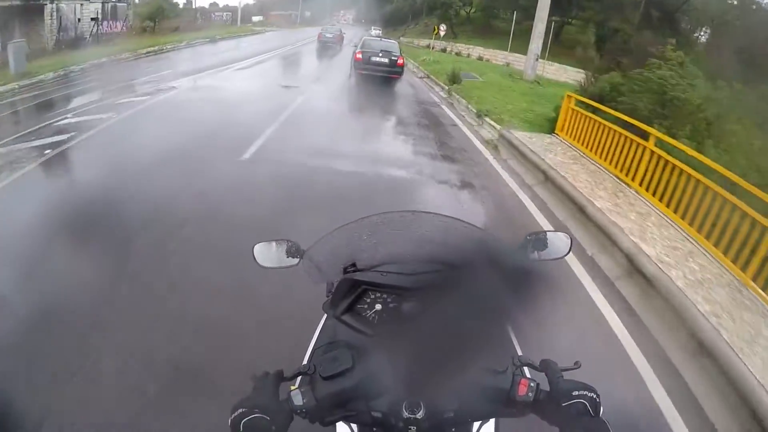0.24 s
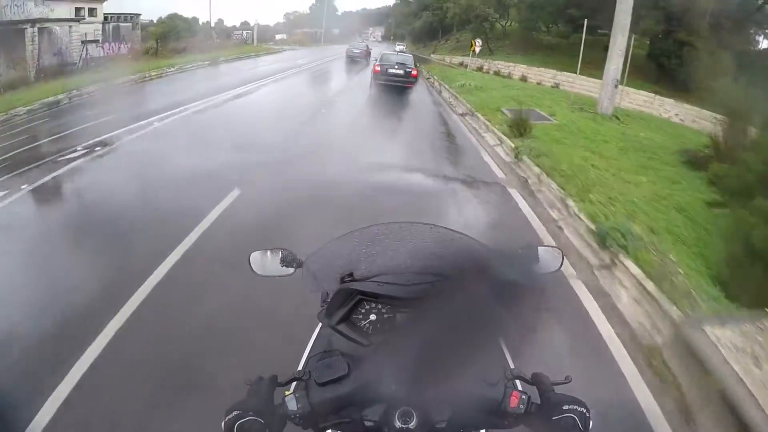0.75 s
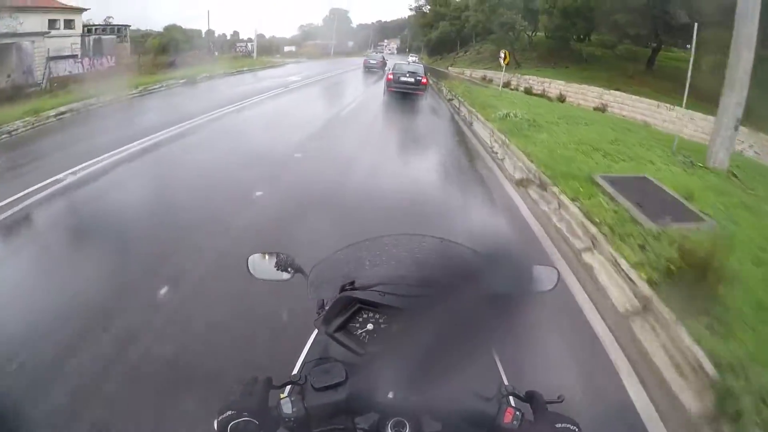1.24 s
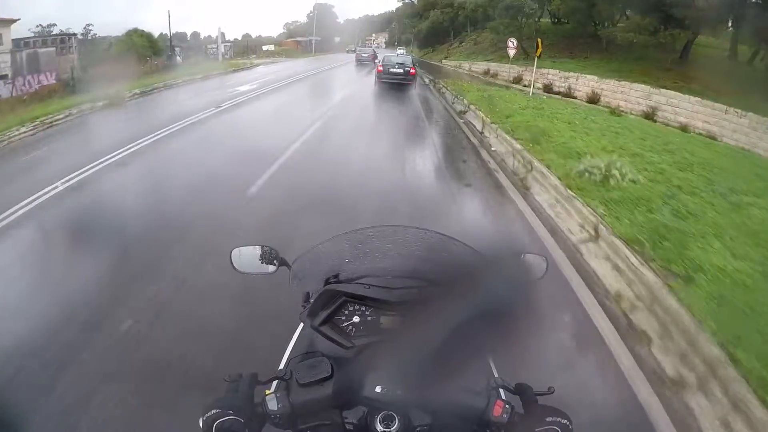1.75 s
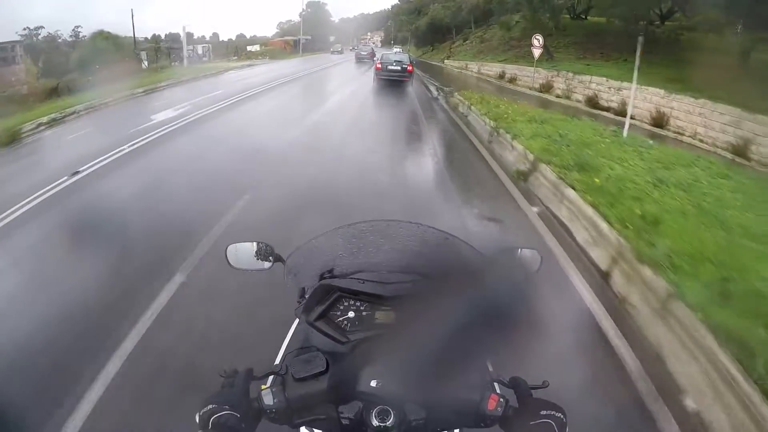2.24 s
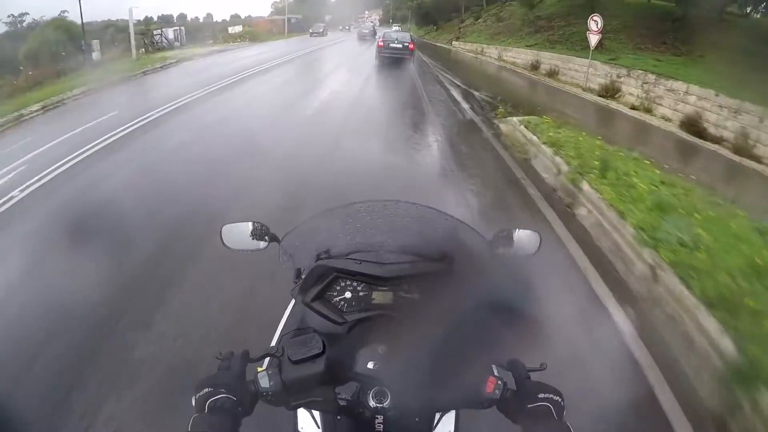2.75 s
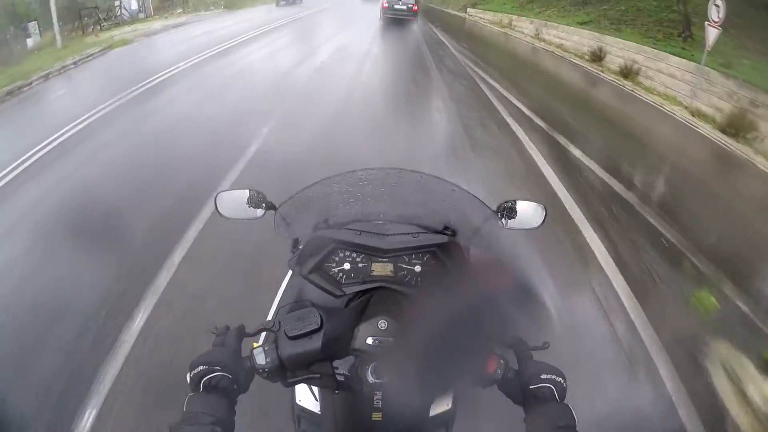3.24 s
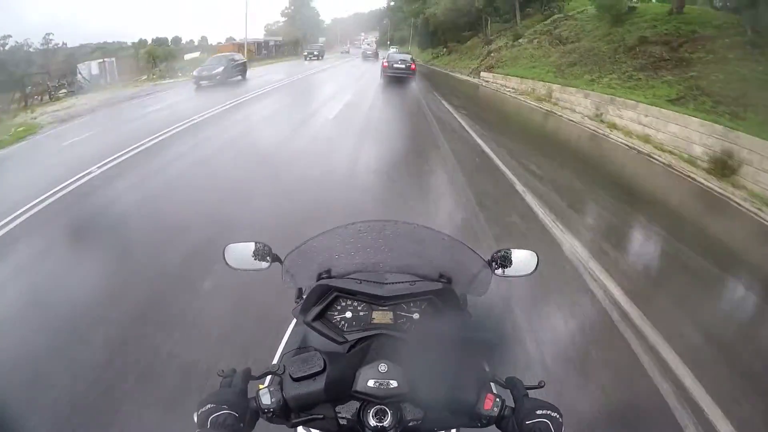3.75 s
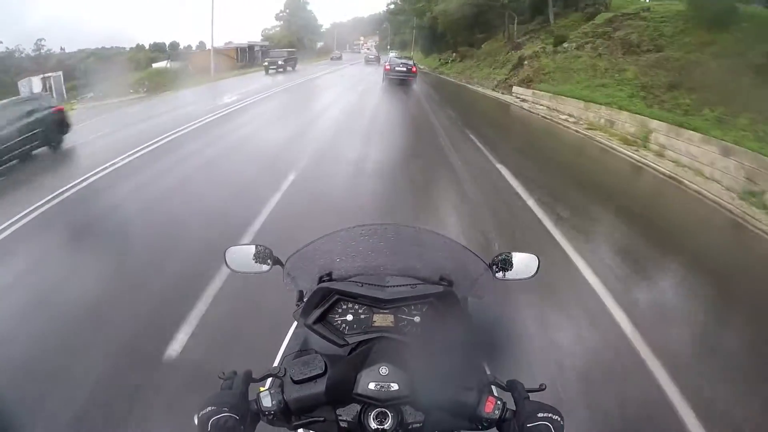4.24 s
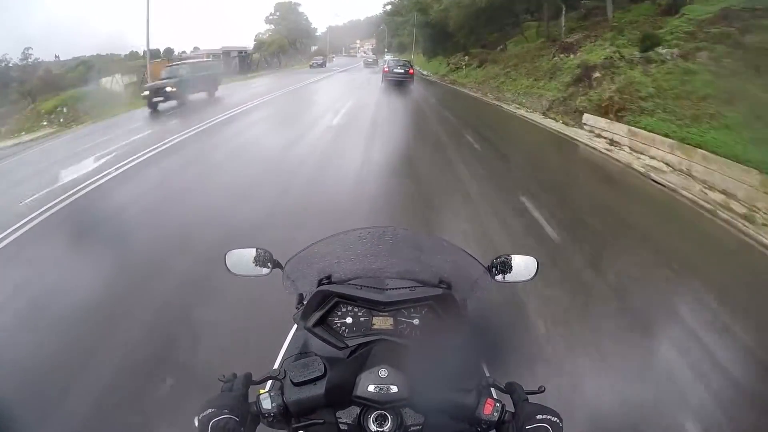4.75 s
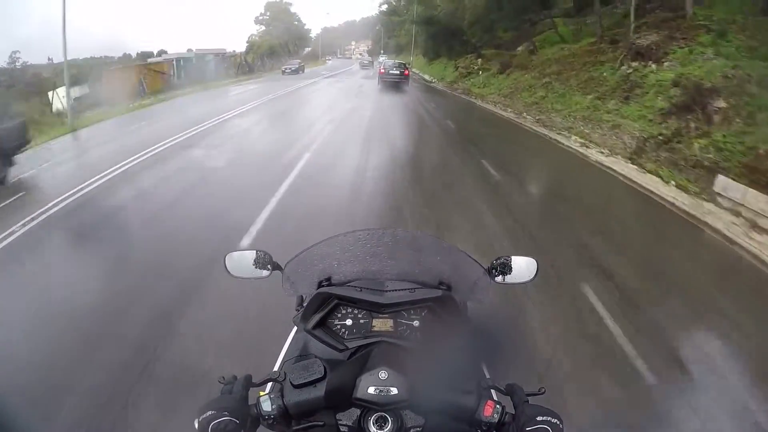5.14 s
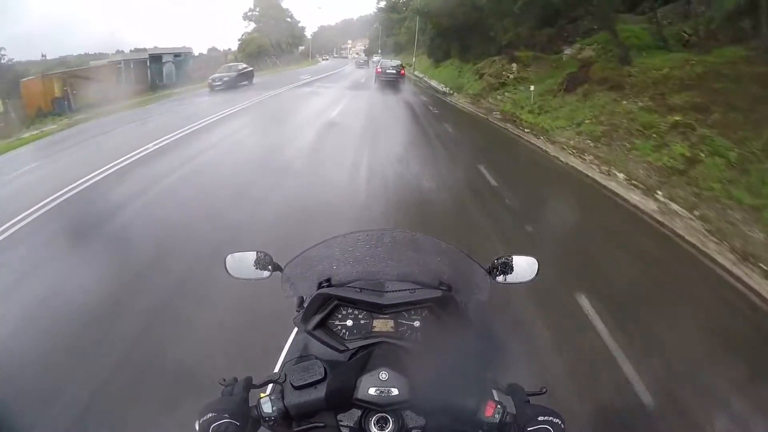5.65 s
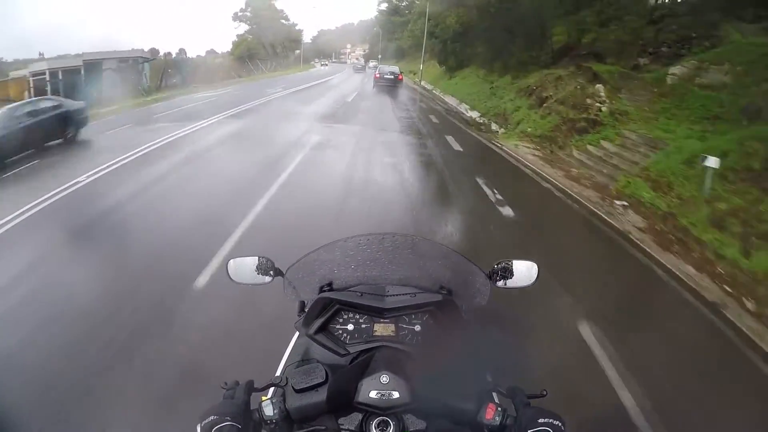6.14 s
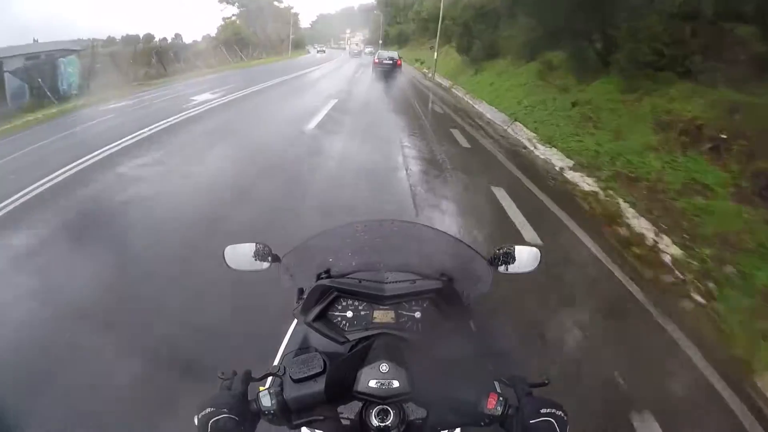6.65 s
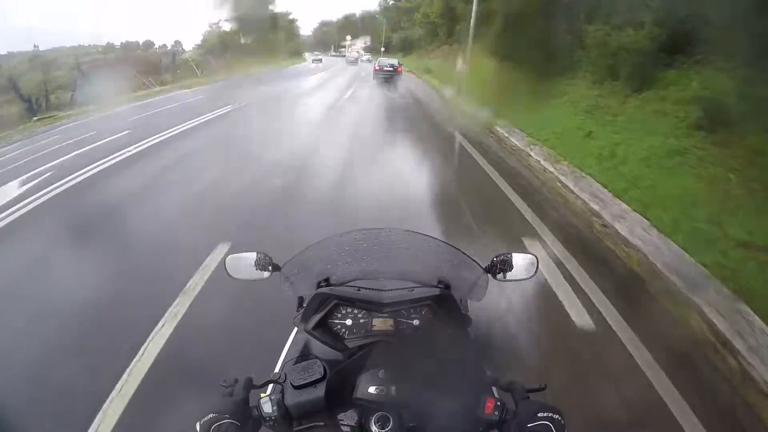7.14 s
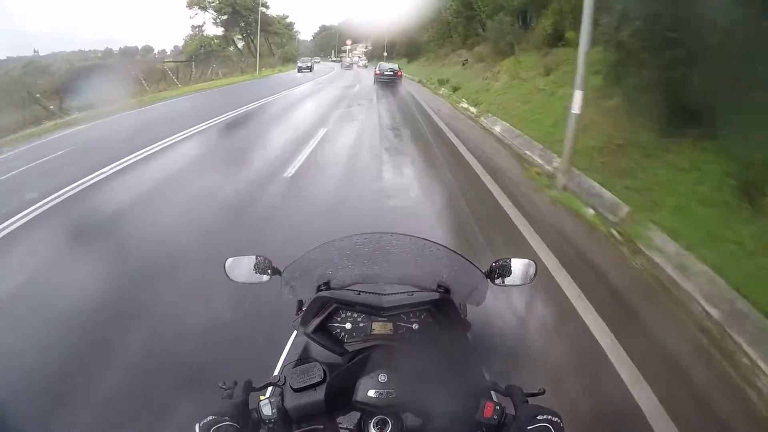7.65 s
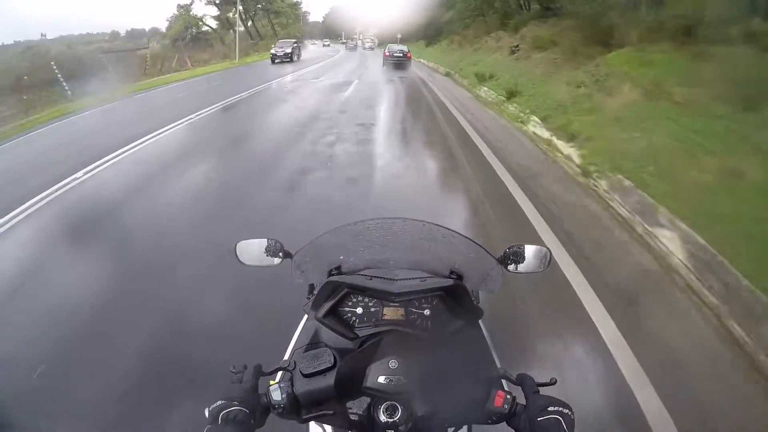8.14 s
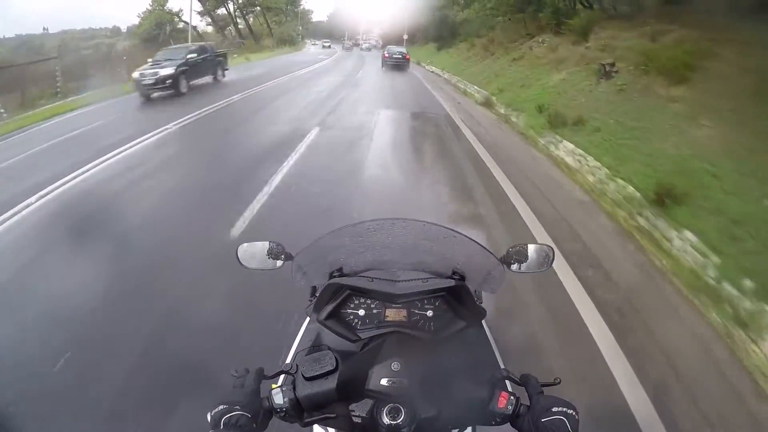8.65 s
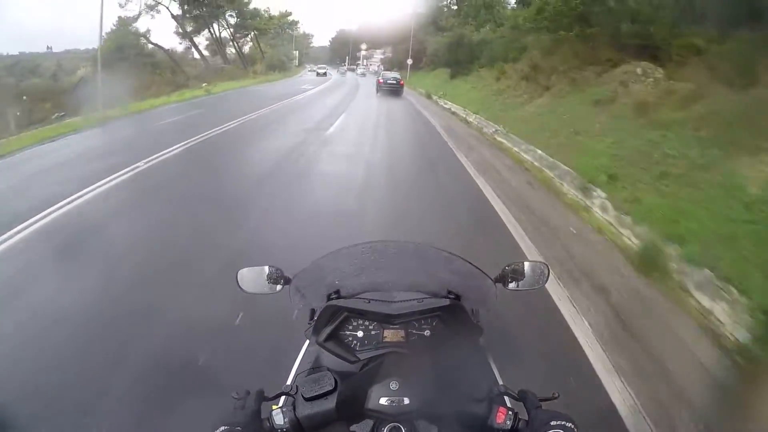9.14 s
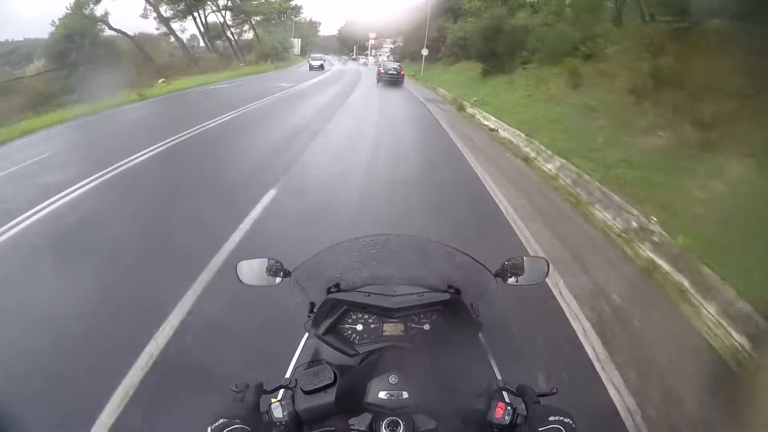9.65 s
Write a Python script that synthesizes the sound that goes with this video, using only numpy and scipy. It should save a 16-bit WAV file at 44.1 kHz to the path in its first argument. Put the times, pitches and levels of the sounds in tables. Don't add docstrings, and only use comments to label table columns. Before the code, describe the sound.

Muffled rushing air swells on a rainy ride, with a deep steady engine hum beneath and sharp irregular drop hits on a hard housing.

```python
import sys
import numpy as np
from scipy import signal
from scipy.fft import rfft, irfft, next_fast_len
from scipy.io import wavfile
from scipy.ndimage import uniform_filter1d, map_coordinates

SR = 44100
rng = np.random.default_rng(int(sys.argv[2]) if len(sys.argv) > 2 else 0)


def generate_wav(signal):
    frames = np.transpose(np.atleast_2d(signal))
    scaled = np.clip(frames, -1, 1) * 32767
    pcm = np.round(scaled).astype(np.int16)
    wavfile.write(sys.argv[1], SR, pcm)


def gain_from_db(level_db):
    decades = np.asarray(level_db, float) / 20
    return 10 ** decades


N = 436590

# t/s, airflow/dB, wetness/dB
AIR_AND_ROAD = [(0, -34.5, 0.5), (.9, -34, 1), (1.5, -32.5, 1.5), (2.1, -29, 0.5), (2.9, -27.5, -1),
                (3.45, -27, -5.5), (3.6, -29.5, -3), (4.7, -28, -5), (5.3, -22.5, -1), (6.3, -23.5, -2),
                (7.1, -20.5, 0), (8.1, -21.5, 0.5), (8.6, -20.5, -1), (9.3, -17.5, 2), (9.9, -17.5, 2)]
SPRAY_GROWS = 0.55


def unit(x):
    return x / np.sqrt(np.mean(x ** 2) + 1e-20)


def curves(rows):
    s, *columns = np.transpose(rows)
    return [np.interp(np.arange(N) / SR, s, column) for column in columns]


def wobble(rate):
    knots = rng.standard_normal(int(N * 400 / SR) + 4)
    return map_coordinates(knots, [np.arange(N) * rate / SR])


def swells(rows):
    t = np.arange(0, N, 64) / SR
    humps = sum(db * np.exp(-8 * ((t - s) / length) ** 2) for s, length, db in rows)
    return np.interp(np.arange(N) / SR, t, humps)


def filtered(x, response):
    m = next_fast_len(N + 8192)
    return irfft(rfft(x, m) * response(np.fft.rfftfreq(m, 1 / SR)), m)[:N]


def resonances(modes):
    def response(f):
        return sum((-1) ** k * gain_from_db(db) * 1j * f * width / (centre ** 2 - f ** 2 + 1j * f * width)
                   for k, (centre, width, db) in enumerate(modes))
    return response


def rush(spectrum, patchy_db):
    z = signal.stft(rng.standard_normal(N), nperseg=512)[2]
    patches = uniform_filter1d(rng.standard_normal(z.shape), size=6, axis=0)
    patches = uniform_filter1d(patches, size=10, axis=1)
    noise = signal.istft(z * gain_from_db(patchy_db * unit(patches)), nperseg=512)[1][:N]
    f, db = np.transpose(spectrum)
    return unit(filtered(noise, lambda hz: gain_from_db(np.interp(np.log(hz + 1), np.log(f + 1), db))))


def add(out, s, sound):
    part = out[round(s * SR):][:len(sound)]
    part += sound[:len(part)]


def ducking():
    # t/s, depth/dB
    cuts = [
        (5.74, 0.5),
        (7.426, 12),
        (7.925, 4),
        (8.712, 9),
        (9.39, 3.5),
    ]
    quick_s, quick_share = .003, .6
    settle_s, recover_s = 0.065, 0.57
    t = np.arange(0, N, 16) / SR
    gain_db = np.zeros(len(t))
    for s, depth_db in cuts:
        since = np.maximum(t - s, 0)
        fall = 1 - quick_share * np.exp(-since / quick_s) - (1 - quick_share) * np.exp(-since / settle_s)
        gain_db -= depth_db * fall * np.exp(-(since / recover_s) ** 1.46)
    return np.interp(np.arange(N) / SR, t, gain_db)


def final_drive():
    # t/s, f/Hz, level/dB
    whine = [(0, 925, -52), (.6, 1000, -50), (1.2, 1085, -52), (1.5, 1130, -60), (2, 1200, -55),
             (2.6, 1280, -58), (9.9, 1500, -90)]
    whine_hz, whine_db = curves(whine)
    phase = 2 * np.pi * np.cumsum(whine_hz) / SR + .9 * wobble(40)
    return gain_from_db(whine_db + 2.5 * wobble(15)) * np.sin(phase)


def engine():
    # t/s, firing rate f/Hz, first order level/dB, third order level/dB
    revs = [(0, 53.6, -36, -44), (.6, 55.7, -35.5, -46), (1.2, 59.6, -35, -46.5), (2, 63, -34, -47.5),
            (2.4, 64.67, -36, -51), (3, 66.9, -35, -53), (3.6, 67.6, -36, -56), (7.4, 67, -33, -58),
            (9.9, 67, -33, -58)]
    # order, level/dB re third order
    overtones = [(2, 5.5), (3, 1.5), (4, -15), (5, -6.5), (6, -17), (10, -15), (11, -16), (14, -11),
                 (15, -5), (17, -13)]
    fairing_hz, fairing_width_hz = 980, 130
    rate_hz, first_db, third_db = curves(revs)
    turn = 2 * np.pi * np.cumsum(rate_hz) / SR
    tone = gain_from_db(first_db + 2.5 * wobble(6)) * np.sin(turn)
    for order, db in overtones:
        off_db = 6 * (order > 12) * ((order * rate_hz - fairing_hz) / fairing_width_hz) ** 2
        level = gain_from_db(third_db + db - off_db + 0.63 * wobble(4.7))
        tone += level * np.sin(order * turn + 6 * rng.random())
    return np.sqrt(2) * (tone + final_drive())


def drizzle():
    chance = rng.random((900, 4))
    when = chance[:, 0] * (N - 1) / SR
    flow_db, wet_db = curves(AIR_AND_ROAD)
    spray_db = SPRAY_GROWS * (flow_db - flow_db[0]) + wet_db + ducking()
    spray_db += 3.5 * wobble(5)
    tail_db = -3.5 * np.log(chance[:, 1] + 0.024)
    size_db = spray_db[(when * SR).astype(int)] - 57.5 + tail_db
    return np.c_[when, size_db - 12 * chance[:, 2], size_db + 7 - 7 * chance[:, 3]]


def band(x, lo_hz, hi_hz):
    return signal.sosfilt(signal.butter(3, [lo_hz, hi_hz], "band", fs=SR, output="sos"), x)


def ticks():
    # t/s, dull level/dB, bright level/dB
    splashes = [(.33, -33, -35), (.3965, -18.5, -14), (.632, -29, -33), (.6399, -30, -26), (1.257, -33, -25),
                (2.2633, -29.5, -30), (2.3044, -16.5, -12), (2.4296, -17.5, -25.5), (3.534, -30, -23),
                (3.5825, -32, -22), (3.6017, -34, -28), (4.9511, -31, -33), (5.0138, -24, -18.5),
                (5.522, -31, -24), (5.7509, -17, -2), (5.7542, -17.5, -14), (5.8406, -28, -24),
                (5.9703, -27, -25), (6.1756, -28.5, -25), (6.2765, -29, -20), (7.0405, -27, -15),
                (7.1746, -21.5, -17), (7.442, -12.5, -13), (7.9366, -15, -15), (8.2048, -25, -19),
                (8.7265, -23, -10), (8.8605, -25, -25), (9.2912, -20, -15.5), (9.403, -20, -27),
                (9.8121, -25.5, -14.5),
                (.422, -29, -35), (1.2432, -37, -34), (1.3493, -36, -29), (3.813, -49, -35), (6.6692, -40, -34),
            (2.079, -30, -33), (2.1061, -34, -36), (6.6129, -39, -34), (3.8931, -43, -35),
            (3.9934, -35, -31), (4.532, -37, -46), (5.7319, -35, -34), (5.855, -37, -26),
            (7.4929, -38, -47), (6.643, -36, -26), (6.7101, -33, -28), (6.765, -34, -31),
            (6.9953, -32, -24), (7.0828, -36, -38), (7.1537, -28, -26), (8.376, -33, -27),
            (8.468, -33, -30), (8.6946, -35, -31), (8.7096, -36, -32), (8.7219, -35, -30), (8.79, -33, -27),
            (8.9084, -46, -29), (9.1663, -31, -24), (9.3417, -39, -36), (9.8532, -33, -25)]
    dull, bright, t = np.zeros(N), np.zeros(N), np.arange(256) / SR
    shape = gain_from_db(-60 * t / 0.0071)
    for s, dull_db, bright_db in np.vstack([splashes, drizzle()]):
        z = rfft(shape * rng.standard_normal(len(t)))
        splash = shape ** .5 * irfft(z / np.abs(z) ** .7)
        splash /= np.linalg.norm(splash)
        add(dull, s + 0.00055, gain_from_db(dull_db + 26.0) * splash)
        add(bright, s + 0.00067, gain_from_db(bright_db + 19.5) * splash)
    sparkle = band(bright, 9800, 11640) + gain_from_db(-7.0) * band(bright, 10800, 16000)
    return band(dull, 3400, 8070) + sparkle


def drops():
    # t/s, top panel level/dB, then door, side and rim level/dB re top
    hits = [(0.3303, -4.5, -13.5, -11, -28), (0.3965, -14.5, 4.5, 4, -7), (0.6313, -21.5, 5, -15, -3),
            (0.64, -22, -12, -8, -7), (0.7335, -23.5, 8.5, 8.5, -17), (1.0368, -18.5, -3.5, -18, -24),
            (1.2565, -24, -1.5, -4, -12), (2.2635, -25.5, 3, 8, -15), (2.3042, -4.5, -10, -7, -8),
            (2.4287, -31, -5, 2, 9), (3.0393, -23, 0, 6, -15), (3.0565, -21, 7, -1, -13),
            (3.0724, -24, -11, 12, -19), (3.27, -15, -24, 2.5, -31), (3.5341, -25, 3, -4, -7),
            (5.7514, -12.5, -4, -8, -10), (5.7546, -9, -9, -4, -12), (5.9713, -17, -22, -2, -7),
            (7.1755, -7, -9, -3, -15), (7.442, -5, 3.5, 1.5, -26), (7.9368, -10, -17, 5, -6),
            (8.2045, -9.5, -13, -3, -18), (8.726, 4.5, -6.5, -4.5, -15), (9.4025, -4, -10, -21, -3)]
    # f/Hz, t60/s, level/dB
    panels = [
        (3500, 0.011, 5),
        (1014, 0.015, 4.5),
        (1782, 0.0085, 8.5),
        (2530, 0.0032, 14),
        (4410, 0.0079, 11),
    ]
    # t/s, level/dB, f/Hz, t60/s
    latches = [
        (7.9376, -19.5, 1014, 0.057),
    ]
    door_low_db = -10.5
    out, t = np.zeros(N), np.arange(SR // 25) / SR
    hz, t60, panel_db = np.transpose(panels)[:, :, None]
    sign = np.array([[1], [-1], [1], [-1], [-1]])
    push = gain_from_db(-22) * np.sin(2 * np.pi * 450 * t) * gain_from_db(-60 * t / 0.0077)
    onset = 1 - np.exp(-t / 0.00026)
    for s, db, door_db, side_db, rim_db in hits:
        detune = rng.normal(1, 0.018, (len(hz), 1))
        rings = sign * np.sin(2 * np.pi * hz * detune * t) * gain_from_db(panel_db - 60 * t / t60)
        mode_db = db + np.r_[0, door_db + door_low_db, door_db, side_db, rim_db]
        knock = gain_from_db(mode_db) @ rings + gain_from_db(db + door_db + 7) * push
        add(out, s + 0.00073, knock * onset)
    for s, db, latch_hz, latch_t60 in latches:
        add(out, s, gain_from_db(db - 60 * t / latch_t60) * np.sin(2 * np.pi * latch_hz * t))
    return out


def buffet(speed_db, shake):
    # f/Hz, level/dB
    rumble = [(7.1, -35), (12, 6), (85, 2), (101, -1.5), (160, -32), (210, -43), (350, -120)]
    # centre t/s, length/s, level/dB
    surges = [(.5, .3, -2), (3.6, 0.19, -1), (3.87, .15, 2), (4.75, 0.27, -2), (5.7, .3, 0.5),
              (5.9, 0.26, -1), (7.48, .25, 7.5), (7.75, .4, -1), (8.66, 0.087, -1), (8.9, .15, -5),
              (9.02, .15, 4.5), (9.83, 0.13, 6)]
    level_db = -40 + 1.45 * speed_db + 2 * wobble(4.03) + swells(surges)
    return gain_from_db(level_db) * unit(rush(rumble, patchy_db=-0.5) + 0.65 * shake)


def roar(speed_db, flurry_db, eddies):
    # f/Hz, level/dB
    roar_colour = [(71, -16), (120, -4), (145, -3), (173, -10.5), (204, -9), (291, -8), (340, -4),
                   (533, -10.5), (573, -11.5), (976, -10), (1210, -8.5), (1450, -10), (1880, -32),
                   (3190, -120)]
    level_db = -47.5 + 1.116 * speed_db + 0.34 * wobble(3) + 0.16 * flurry_db
    return gain_from_db(level_db) * unit(gain_from_db(0.64 * eddies) * rush(roar_colour, patchy_db=1.0))


def airy_top(rise_db, wet_db, flurry_db, eddies, shake):
    # f/Hz, level/dB
    airy_colour = [(4500, -25), (6500, 5), (8500, -11), (11400, -3), (13200, -5), (14700, -13),
                   (15400, -12)]
    level_db = -57.5 + .25 * rise_db + 1.1 * wet_db + .6 * flurry_db
    chop_db = 0.28 * eddies + 0.55 * shake
    return gain_from_db(level_db) * unit(gain_from_db(chop_db) * rush(airy_colour, patchy_db=.4))


def spray(rise_db, wet_db, flurry_db, eddies, shake):
    # f/Hz, level/dB
    fizz = [(2820, -14.5), (4800, -3), (5030, -2.5), (5300, -14), (5600, -4), (6410, -14.5), (7260, -5.5),
            (8490, -16.5), (9440, -7), (9860, -7), (11500, -28.5), (15000, -55), (22000, -120)]
    level_db = -51.5 + SPRAY_GROWS * rise_db + wet_db + 1.05 * flurry_db
    chop_db = 0.29 * eddies + 0.75 * shake + 1.2 * wobble(150)
    return gain_from_db(level_db) * unit(gain_from_db(chop_db) * rush(fizz, patchy_db=1.3))


def patter():
    # f/Hz, width/Hz, level/dB
    shell = [(1020, 200, -16), (1684, 103, 7.5), (2220, 350, 9), (3130, 500, 3), (3567, 110, 14.5),
             (4160, 880, 5.5)]
    impacts = rng.standard_normal(N) * (rng.random(N) < 600 / SR)
    return unit(filtered(impacts, lambda f: resonances(shell)(f) / (1 + (f / 4200) ** 8)))


def seam_whistle(eddies):
    # f/Hz, width/Hz, level/dB
    cavities = [
        (2336, 230, 3),
        (3310, 560, 3),
    ]
    puffs = gain_from_db(1.1 * eddies) * rng.standard_normal(N)
    return unit(filtered(puffs, lambda f: resonances(cavities)(f) ** 2))


def hiss(flow_db, rise_db, flurry_db, eddies):
    # f/Hz, level/dB per Hz
    hiss_colour = [(410, -24.5), (700, -22), (955, -9), (1270, -15), (1470, -8.5), (1720, 0), (2110, -2),
                   (2400, 2.5), (2760, -2.5), (3340, 0.5), (3510, -3), (4280, -14.5), (4630, -23.5),
                   (4870, -16), (5500, -24.5), (7150, -32), (12100, -120)]
    # centre t/s, length/s, rise of the seam whistle/dB
    side_gusts = [
        (1.77, 0.14, 14),
        (3.1, 0.43, 13),
        (3.37, 0.4, 10.5),
    ]
    seam_db = -16 + 0.64 * rise_db + swells(side_gusts)
    air = unit(gain_from_db(eddies) * rush(hiss_colour, patchy_db=0.97)) + 0.47 * patter()
    air += gain_from_db(seam_db) * seam_whistle(eddies)
    return gain_from_db(flow_db + flurry_db - 0.1) * air / np.sqrt(1 + gain_from_db(2 * seam_db))


def wind():
    # t/s, level/dB over the start
    speed = [(0, 1.5), (1, 3.5), (3.5, 7.5), (5.5, 10.5), (7.4, 12), (9.9, 13)]
    # centre t/s, length/s, level/dB
    gusts = [(.4, 0.09, 1.5), (.696, 0.072, -2), (.761, 0.097, 0.5), (.89, .1, -1), (1.1, .15, 1),
             (1.29, 0.17, 2), (1.76, .2, 2.5), (1.94, .15, -1.5), (3.07, 0.2, 2.5), (3.3, 0.61, 1.5),
             (3.6, 0.27, -1.5), (3.71, 0.13, 2.5), (4.08, .1, 1), (4.26, 0.13, 3), (4.41, 0.1, -1.5),
             (4.54, 0.35, 2.5), (4.92, 0.1, 3.5), (5.22, .12, -3.5), (5.43, 0.49, 1), (5.635, 0.088, -3),
             (6.0, .25, 1), (7.0, .1, -2), (7.1, .12, 1), (8.18, 0.14, 3), (8.37, 0.11, 3.5),
             (8.6, 0.1, -3.5), (9.25, 0.16, -4.5), (9.66, 0.14, -3), (9.81, .12, -8), (9.9, 0.21, 2)]
    throb_hz, throb_width_hz = 92.3, 7
    flow_db, wet_db = curves(AIR_AND_ROAD)
    rise_db = flow_db - flow_db[0]
    speed_db, flurry_db = curves(speed)[0], swells(gusts)
    shake = unit(filtered(rng.standard_normal(N), resonances([(throb_hz, throb_width_hz, 0)])))
    eddies = 0.44 * wobble(25) + 1.0 * wobble(70) + 0.66 * shake
    low = buffet(speed_db, shake) + roar(speed_db, flurry_db, eddies)
    wet = airy_top(rise_db, wet_db, flurry_db, eddies, shake) + spray(rise_db, wet_db, flurry_db, eddies, shake)
    return low + wet + hiss(flow_db, rise_db, flurry_db, eddies)


def scene():
    steady = engine() + wind()
    return (gain_from_db(ducking()) * steady + drops() + ticks())[None]


def roll_off(x):
    return signal.sosfilt(signal.butter(12, 16470, fs=SR, output="sos"), x)


def record(dry):
    x = dry[0] / (1 + np.abs(dry[0] / .94) ** 8) ** (1 / 8)
    x = filtered(x, lambda hz: 1 / (1 + (hz / 15250) ** 150) + gain_from_db(-48) / (1 + (hz / 16300) ** 70))
    return roll_off(x[None])


dry = scene()
out = record(dry)
generate_wav(out)
```